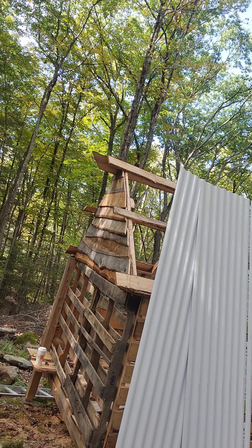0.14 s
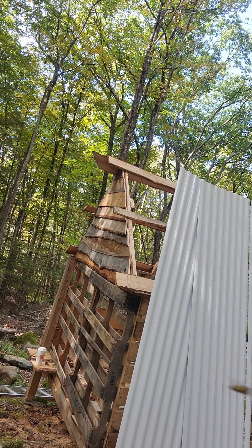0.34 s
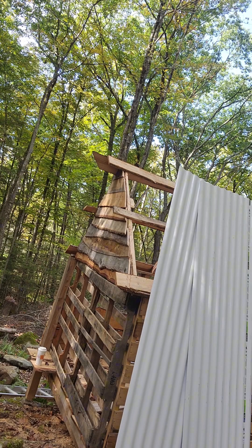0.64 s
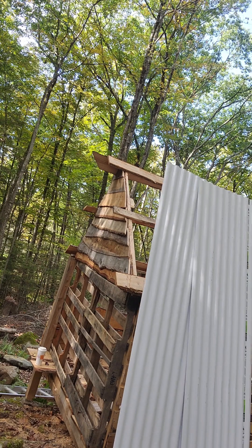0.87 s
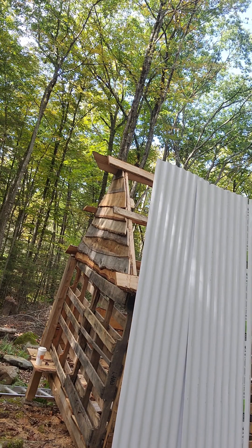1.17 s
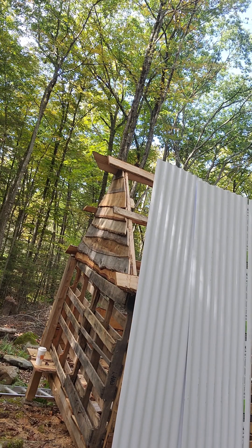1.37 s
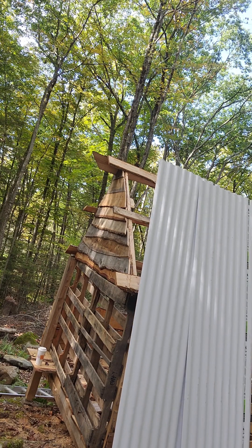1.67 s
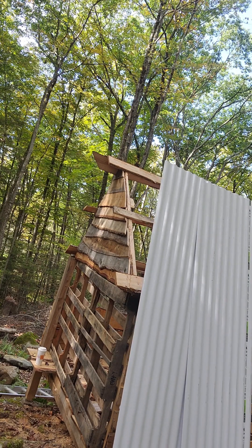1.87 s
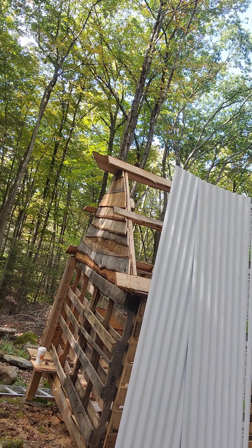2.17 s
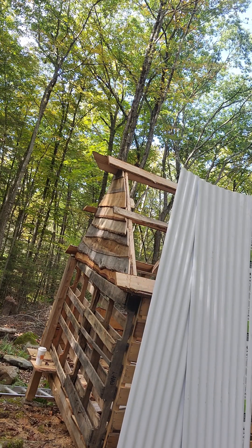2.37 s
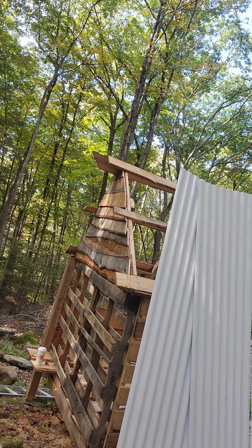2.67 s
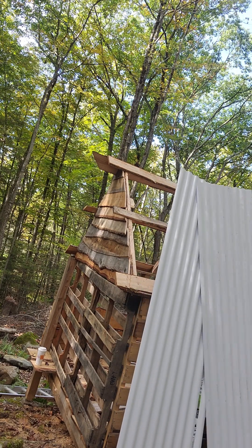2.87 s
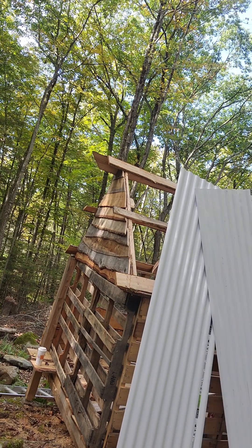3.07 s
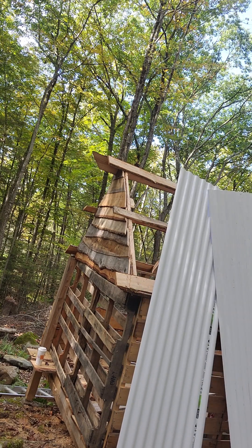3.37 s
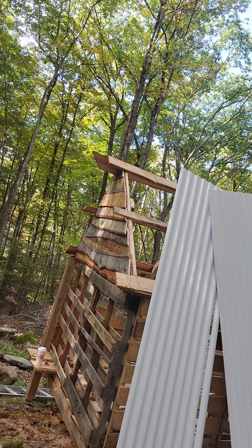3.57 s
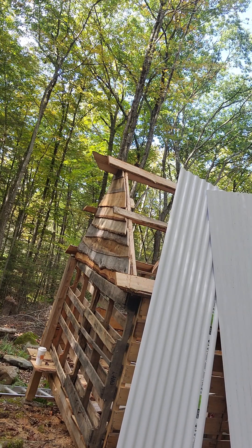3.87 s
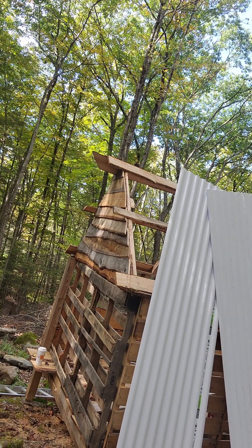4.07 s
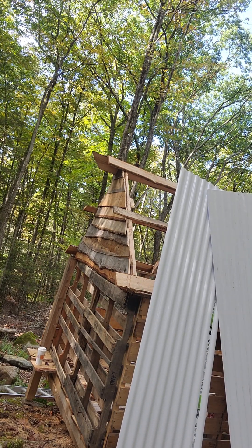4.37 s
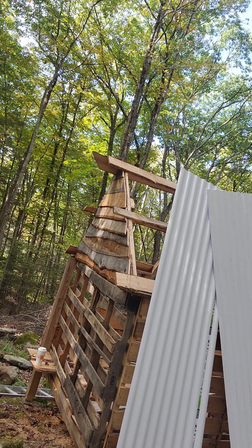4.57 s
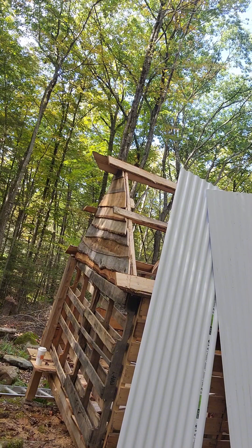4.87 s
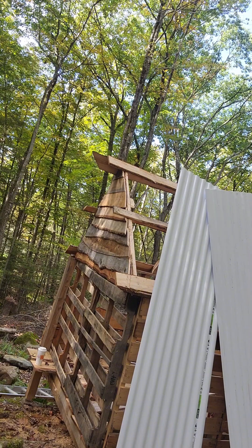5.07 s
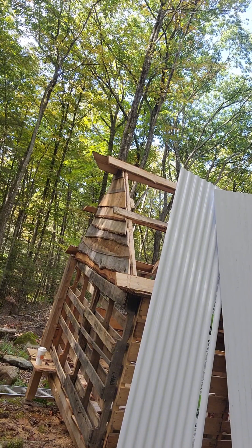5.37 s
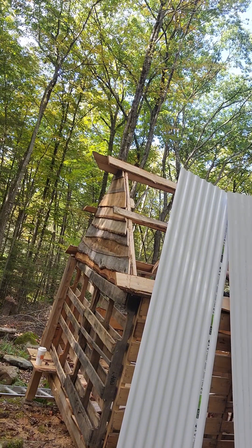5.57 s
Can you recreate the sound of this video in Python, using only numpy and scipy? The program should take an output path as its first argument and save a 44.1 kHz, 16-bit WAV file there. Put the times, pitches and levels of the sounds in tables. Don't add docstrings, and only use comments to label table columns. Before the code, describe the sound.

Close clattering and squeaky scraping of light ribbed plastic panels on wood, with low flexing thuds, over faint leaves and distant traffic drone.

```python
import sys
import numpy as np
from scipy import signal
from scipy.fft import rfft, irfft, next_fast_len
from scipy.io import wavfile
from scipy.ndimage import uniform_filter1d

SR = 44100
rng = np.random.default_rng(int(sys.argv[2]) if len(sys.argv) > 2 else 0)


def unload_audio(sound):
    columns = np.transpose(np.atleast_2d(sound))
    steps = np.round(np.clip(columns, -1, 1) * 32767)
    wavfile.write(sys.argv[1], SR, steps.astype(np.int16))


def field_ratio(decibels):
    return 10 ** (np.asarray(decibels, dtype=float) / 20)


N = 252252


def evened(x):
    return x / np.sqrt(np.mean(x ** 2) + 1e-20)


def read(points, hz):
    f, value = np.transpose(points)
    return np.interp(np.log(hz + 1), np.log(f + 1), value)


def curves(rows):
    s, *columns = np.transpose(rows)
    return [np.interp(np.arange(N) / SR, s, c) for c in columns]


def shape(x, gain_at):
    size = next_fast_len(N + 4096)
    return irfft(rfft(x, size) * gain_at(np.fft.rfftfreq(size, 1 / SR)), size)[..., :N]


def add(mix, s, sound):
    part = mix[max(round(s * SR), 0):][:len(sound)]
    part += sound[:len(part)]


def swell(t, rise, fall):
    env = (1 - np.exp(-t / abs(rise))) ** 2 * np.exp(-t / abs(fall))
    return env / env.max()


def bloom(t, length, lean):
    env = (t / length) ** lean * np.exp(-(t / length) ** 2)
    return env / env.max()


def drifting(width):
    smooth = uniform_filter1d(rng.standard_normal(N), width)
    return evened(uniform_filter1d(smooth, width))


def fuzzy_tone(hz, width_hz):
    return evened(shape(rng.standard_normal(N), lambda f: 1 / (1 + ((f - hz) / width_hz) ** 2)))


def ports(x, other, same, left):
    def alike(f):
        return np.clip(read(same, f), 0, 1)

    late_s = 6e-5
    shared = shape(x, lambda f: alike(f) * np.exp(-2j * np.pi * f * late_s))
    right = shared + shape(other, lambda f: np.sqrt(1 - alike(f) ** 2))
    return np.array([shape(x, lambda f: field_ratio(.5 * read(left, f))),
                     shape(right, lambda f: field_ratio(-.5 * read(left, f)))])


# time_s, drone_db, upper_db
LOW_AIR = [(0.0, -49, -58), (0.27, -47, -53), (1.19, -55, -47), (1.42, -39.5, -54), (1.53, -45.5, -50),
           (2.21, -46.5, -54.5), (2.4, -46.5, -48), (2.66, -42.5, -57.5), (2.87, -44.5, -60.5),
           (3.46, -53, -43.5), (3.63, -46, -58.5), (3.89, -53.5, -54.5), (3.98, -47, -51),
           (4.62, -50.5, -54), (4.72, -49, -50.5), (5.3, -50, -53), (5.53, -47, -43.5), (5.72, -45, -48)]


def low_air():
    drone_db, upper_db = curves(LOW_AIR)
    drone_hz = 51.988 + 0.88247 * drifting(6000)
    drone = np.sqrt(2) * np.sin(2 * np.pi * np.cumsum(drone_hz) / SR) + 0.25 * fuzzy_tone(47.5, 22)
    upper = fuzzy_tone(89.657, 6.0) + 1.2224 * fuzzy_tone(67.485, 20.0)
    wind = np.array([fuzzy_tone(66, 24), fuzzy_tone(61, 23)])
    rumble = np.array([fuzzy_tone(44, 11), fuzzy_tone(47, 18)])
    gusty = np.clip(np.arange(N) / SR - 3.4, 0, 1)
    buffets = field_ratio(upper_db) * (field_ratio(-1.5 - 4.17 * gusty) * upper + field_ratio(-16.5 + 6.4 * gusty) * wind)
    steady = field_ratio(drone_db - 3.9 * gusty) * drone
    return steady + buffets + field_ratio(drone_db - 10.0 + 11.335 * gusty) * rumble


# frequency_hz, level_db_per_hz
WOODS_SPECTRUM = [(60, -16), (110, -2), (320, -23), (900, -15), (1600, -19.5), (2600, -28.5), (6300, -32),
                  (7400, -47.5)]
# frequency_hz, likeness_0_to_1
WOODS_LIKENESS = [(60, 0.65), (180, 1), (550, 0.8442), (1650, 0.079), (4970, 0.01), (15000, 0.04)]
# frequency_hz, left_minus_right_db
WOODS_BALANCE = [(60, -14), (180, 4.5), (550, 3.5), (1650, 3), (4970, 6), (15000, 4.5)]


def woods():
    def colour(f):
        insects_db = 5 * np.exp(-((f - 4685.4) / 330) ** 2)
        return field_ratio(read(WOODS_SPECTRUM, f) + insects_db)

    a, b = shape(rng.standard_normal((2, N)), colour)
    level_db = -58.5 + 0.61 * drifting(5000)
    return field_ratio(level_db) * evened(ports(a, b, WOODS_LIKENESS, WOODS_BALANCE))


# start_s, level_db, pitch_hz, left_minus_right_db
WIND_PUFFS = [(4.15, -36.5, 47.29, -9), (4.227, -40, 71.69, 18.5), (4.34, -39, 52.32, -23.5),
              (4.49, -42.5, 48.89, -7.5), (4.684, -36, 101.5, -21.5), (4.74, -38.5, 56.04, 0),
              (4.88, -36, 57.45, 25), (4.93, -33.5, 77.36, 15.5), (5.059, -40.5, 55.9, -10.5),
              (5.259, -37.5, 57.44, -28), (5.439, -33, 92, -30)]


def puffs():
    out, t = np.zeros((2, N)), np.arange(5000) / SR
    for s, db, hz, left_db in WIND_PUFFS:
        push = field_ratio(db) * np.sin(2 * np.pi * hz * t) * bloom(t, 1.3903 / hz, lean=0.9596)
        add(out[0], s, push * field_ratio(min(left_db, 0) + 4.0))
        add(out[1], s, push * field_ratio(min(-left_db, 0) + 2.5))
    return out


def frame_echo(x):
    t = np.arange(9000) / SR
    signs = rng.choice([-1., 1.], (2, len(t)))
    taps = signs * (rng.random((2, len(t))) < .045) * (t > .004)
    taps = taps * field_ratio(-60 * t / 0.15547)
    return signal.oaconvolve(x[None], taps / np.linalg.norm(taps[0]), axes=1)[:, :N]


def scattered(x):
    z = signal.stft(x, nperseg=256, noverlap=192)[2]
    drift = uniform_filter1d(rng.standard_normal(z.shape[::-1]).T, size=8, axis=0)
    drift = uniform_filter1d(drift, size=60, axis=1)
    return signal.istft(z * np.exp(2.5j * evened(drift)), nperseg=256, noverlap=192)[1][:N]


# start_s, level_db, pitch_hz
BUCKLES = [(0.359, -40, 134.1), (0.391, -38.5, 200.8), (0.7968, -30.5, 241.3), (0.817, -37, 212.7),
           (0.856, -28.5, 160.2), (0.833, -35.5, 160.7), (0.879, -39, 134.1), (0.887, -40.5, 198.5),
           (0.906, -38.5, 186.2), (1.087, -34, 212.6), (1.229, -39, 148.9), (1.317, -37.5, 186),
           (1.931, -37, 198.6), (1.951, -40.5, 156.4), (2.567, -40.5, 196.5), (1.611, -39, 170.1),
           (1.92, -41, 211), (2.144, -39, 192.2), (2.224, -36.5, 234.4), (2.296, -30, 189.2),
           (2.409, -36.5, 123.5), (2.967, -39.5, 334.6), (3.003, -42.5, 288.6), (3.133, -44.5, 284.9),
           (3.242, -44, 322.4), (3.253, -37.5, 171.2), (3.298, -33.5, 410.7), (3.364, -29.5, 304.3),
           (3.378, -36.5, 194.8), (3.41, -33, 149.8), (3.4195, -31.5, 151), (3.43, -33, 129.6),
           (3.469, -37, 178.4), (3.495, -35, 169.5), (3.618, -33.5, 140.7), (3.642, -37.5, 255.1),
           (3.672, -31, 196.7), (3.7, -38, 250), (3.723, -33.5, 202.8), (3.76, -36, 141.3),
           (3.826, -43, 223.8), (3.87, -40, 219.7), (4.083, -37, 180.9), (4.028, -42.5, 254.4),
           (4.09, -36, 299.6), (4.116, -34.5, 380.6), (4.298, -37, 211), (4.36, -40, 194.3),
           (4.428, -40, 304.6), (4.515, -42.5, 199.9), (4.797, -41, 149.6), (5.274, -39.5, 176),
           (5.374, -41.5, 202.2), (5.559, -25.5, 127.8), (5.67, -33.5, 141.9), (5.684, -36, 170.2)]


def thuds():
    out, t = np.zeros(N), np.arange(6000) / SR
    u = t / 0.0005553
    pop = u ** 2 * (3 - u) * np.exp(1 - 1.1472 * u)
    for s, db, hz in BUCKLES:
        pop_db = -2 - 3.5 * np.log2(hz / 170)
        body = np.sin(2 * np.pi * hz * t) * swell(t, 0.0007, 2.0 / hz)
        body = body + 0.20753 * np.sin(2 * np.pi * 2.2 * hz * t) * swell(t, 0.00027, 3.373 / hz)
        add(out, s, field_ratio(db - 5.5) * (body + field_ratio(pop_db) * pop))
    return out


# start_s, level_db, brightest_hz
EDGE_SNAPS = [(0.767, -36.5, 2720), (0.7873, -33, 3102), (0.8015, -32, 4934), (0.9579, -31, 2760),
              (1.0635, -38.5, 3472), (2.077, -33.5, 2407), (2.1002, -43, 2400), (2.13, -43.5, 4000),
              (2.228, -37, 3005), (2.293, -30.5, 3382), (2.311, -37, 3000), (2.337, -36.5, 3896),
              (2.762, -42, 3424), (2.819, -50.5, 3770), (2.866, -40, 2560), (2.9501, -28.5, 3504),
              (2.992, -50.5, 3333), (3.055, -49.5, 4500), (3.073, -48.5, 5034), (3.2167, -40.5, 2995),
              (3.241, -41, 3126), (3.389, -35.5, 2800), (3.016, -43, 5460), (3.1121, -44, 5760),
              (3.257, -38, 3501), (3.37, -29.5, 5297), (3.726, -45.5, 2730), (3.907, -41, 3484),
              (4.106, -50.5, 3494), (5.598, -36.5, 3515), (5.6145, -35.5, 6130), (5.64, -37, 6400),
              (5.644, -38, 6260)]
# frequency_hz, level_db_per_hz
GRIT_SPECTRUM = [(700, -57.5), (1600, -1), (2600, 0.5), (4000, -0.5), (5500, 1), (7400, -3.5),
                 (15000, -10.5)]


def edge_snaps():
    out, t = np.zeros(N), np.arange(1024) / SR
    hz_axis = np.fft.rfftfreq(len(t), 1 / SR)
    for (s, db, hz), noise in zip(EDGE_SNAPS, rng.standard_normal((len(EDGE_SNAPS), len(t)))):
        tilt = .08 + 1 / (1 + ((hz_axis - hz) / 1900) ** 2)
        burst = evened(irfft(rfft(noise) * field_ratio(read(GRIT_SPECTRUM, hz_axis)) * tilt))
        add(out, s - .0005, field_ratio(db - 12.0) * burst * swell(t, 0.0001, 0.0022))
    return out


# start_s, level_db, brightest_hz, length_s
WOOD_SCUFFS = [(0.7816, -31, 5908, 0.006193), (0.785, -34.5, 3187, 0.00705), (1.06, -47.5, 3380, 0.01857),
               (1.379, -51, 3216, 0.0118), (1.5959, -49.5, 2628, 0.01424), (3.296, -47, 2515, 0.02679),
               (3.371, -47.5, 5590, 0.012), (3.383, -42.5, 2509, 0.01383), (3.668, -45, 3124, 0.01035),
               (3.682, -44, 3219, 0.010115), (3.907, -38, 2583, 0.005186), (4.1026, -47.5, 2920, 0.01498),
               (5.524, -39, 5725, 0.01295), (5.599, -44.5, 3710, 0.00898), (5.623, -53.5, 5586, 0.01275)]
# start_s, level_db, brightest_hz, length_s
SHEET_RASPS = [(0.944, -41.5, 2646, 0.017033), (2.074, -47.5, 2496, 0.005574),
               (2.097, -54.5, 2503, 0.01508), (2.1283, -49.5, 3932, 0.02734),
               (2.231, -45.5, 3747, 0.007324), (2.2951, -41, 3354, 0.01668), (2.324, -48.5, 2851, 0.02128),
               (2.753, -42.5, 3052, 0.03001), (2.823, -43.5, 3780, 0.01783), (2.721, -53, 3344, 0.01643),
               (2.765, -44.5, 7560, 0.01801), (2.869, -41.5, 2570, 0.02243), (2.947, -39, 5227, 0.0119),
               (2.981, -41.5, 3286, 0.02255), (2.998, -42.5, 5460, 0.05593), (3.066, -37, 4988, 0.0077),
               (3.1, -40, 5637, 0.0363), (3.261, -42.5, 3359, 0.01776), (3.153, -42, 3223, 0.01445),
               (3.213, -54.5, 3000, 0.01275), (3.243, -48.5, 3194, 0.00596), (2.052, -51, 3899, 0.017),
               (2.423, -55.5, 3500, 0.00959)]


def scratches():
    out, t = np.zeros(N), np.arange(4096) / SR
    hz_axis = np.fft.rfftfreq(len(t), 1 / SR)
    # finest grit in dB, muffled by wood but not by plastic
    rows = [row + (-14,) for row in WOOD_SCUFFS] + [row + (-0.5,) for row in SHEET_RASPS]
    draws = rng.standard_normal((len(rows), 2, len(t)))
    for (s, db, hz, length, fine_db), (noise, bumps) in zip(rows, draws):
        peak = 1 + 1.3 / (1 + ((hz_axis / hz - 1) / .16) ** 2)
        colour = field_ratio(read(GRIT_SPECTRUM, hz_axis)) * peak * field_ratio(fine_db * (hz_axis > 8800))
        crackle = field_ratio(3.2 * evened(uniform_filter1d(bumps, size=70)))
        burst = evened(irfft(rfft(noise * crackle) * colour))
        add(out, s - .001, field_ratio(db - 10.5) * burst * bloom(t, 1.4046 * length, lean=0.3))
    return out


# start_s, level_db, pitch_hz, length_s
RIB_SQUEAKS = [(0.892, -46.5, 1064, 0.00887), (1.103, -47, 889.2, 0.00652), (1.13, -49.5, 1394, 0.005345),
               (1.176, -57, 1042, 0.0067), (1.253, -50.5, 802.9, 0.0074), (1.316, -48, 804, 0.00478),
               (1.382, -48.5, 907.8, 0.00575), (1.81, -46.5, 907.4, 0.01166), (1.859, -54, 1904, 0.00843),
               (1.865, -52, 707.6, 0.00868), (2.076, -54, 2426, 0.00517), (2.114, -48, 991.7, 0.00708),
               (2.125, -55.5, 4020, 0.00531), (2.153, -46.5, 892.2, 0.00795), (2.207, -32.5, 806, 0.005006),
               (2.439, -42, 795, 0.010365), (2.489, -53.5, 849.4, 0.0236), (2.567, -49, 736.4, 0.00757),
               (2.619, -53.5, 786, 0.01833), (2.753, -57.5, 2845, 0.00576), (2.764, -56, 3491, 0.00895),
               (2.779, -50.5, 2198, 0.01234), (2.791, -53.5, 2782, 0.00763), (2.818, -35, 1300, 0.00763),
               (2.891, -59.5, 3222, 0.00501), (3.014, -48, 5464, 0.00588), (3.053, -50, 4522, 0.00407),
               (3.072, -49.5, 5045, 0.00525), (3.12, -33.5, 2009, 0.003373), (3.132, -45, 2046, 0.0034),
               (3.282, -45, 1200, 0.01338), (3.303, -48, 2506, 0.00631), (3.762, -54, 788.9, 0.0083)]


def squeaks():
    out, t = np.zeros(N), np.arange(2600) / SR
    for s, db, hz, length in RIB_SQUEAKS:
        note = np.sin(2 * np.pi * hz * t * (1 - 0.02184 * t / length))
        add(out, s, field_ratio(db) * note * bloom(t, length, lean=0.5573))
    return out


# start_s, level_db, pitch_hz, ring_s
EDGE_RAPS = [(0.395, -43.5, 887.3, 0.00399), (0.768, -54.5, 894.3, 0.004385),
             (0.7858, -34, 879.7, 0.005966), (0.7965, -31, 600.7, 0.0032), (0.8055, -35.5, 709.1, 0.0045),
             (0.811, -42, 458.9, 0.00405), (0.8565, -43, 503.8, 0.0029), (0.885, -48, 1494, 0.002886),
             (0.902, -46, 999.6, 0.00701), (1.9097, -39, 1236, 0.003283), (2.069, -37, 968.8, 0.0039),
             (2.085, -46, 909.6, 0.00702), (2.146, -34, 1099, 0.0061), (2.235, -35, 911.9, 0.00819),
             (2.324, -44, 806.7, 0.00657), (2.337, -34.5, 1404, 0.00523), (2.978, -37, 1302, 0.0082),
             (3.018, -40.5, 895.3, 0.01036), (3.093, -34, 1080, 0.00753), (3.128, -39.5, 1924, 0.003673),
             (3.143, -37.5, 1320, 0.0115), (3.204, -36.5, 504.2, 0.00969), (3.2407, -42.5, 989.6, 0.004035),
             (3.254, -48.5, 1098, 0.003435), (3.3645, -33, 468.7, 0.0039), (3.374, -30.5, 721.5, 0.0062),
             (3.3905, -34.5, 1001, 0.001692), (3.399, -39, 596.1, 0.00524), (3.4095, -30, 399.8, 0.0044),
             (3.671, -38, 1181, 0.00317), (3.471, -47, 887.3, 0.0026), (4.216, -44.5, 705.9, 0.0041),
             (4.45, -44.5, 756.4, 0.0042), (4.514, -55.5, 826, 0.004507), (4.802, -49, 1050, 0.007),
             (5.127, -49.5, 906.4, 0.015), (5.258, -48.5, 640.8, 0.007), (5.372, -43.5, 702.7, 0.003075),
             (5.42, -47.5, 1051, 0.0058), (5.488, -56.5, 707.4, 0.00508), (5.5982, -18.5, 817.5, 0.004467),
             (5.603, -28, 646, 0.0059), (5.609, -33.5, 838.3, 0.0072), (5.622, -37, 748, 0.00734),
             (5.638, -46.5, 1096, 0.0028)]


def raps():
    out, t = np.zeros(N), np.arange(3000) / SR
    rise_s = 0.00032
    for s, db, hz, ring in EDGE_RAPS:
        low = np.sin(2 * np.pi * hz * t) * swell(t, rise_s, ring)
        high = np.sin(2 * np.pi * 1.6 * hz * t) * swell(t, rise_s, 0.5858 * ring)
        add(out, s, field_ratio(db - 5.5) * (low + field_ratio(-5) * high))
    return out


def grains(modes, per_s, cycles, spread_db, detune):
    out = np.zeros(N)
    size = field_ratio(spread_db * np.minimum(rng.exponential(1, N), 3)) * (rng.random(N) < per_s / SR)
    pick = rng.integers(0, 3 * len(modes), N)
    for k, (hz, db) in enumerate(modes * 3):
        hz = hz * (1 + detune * (k // len(modes) - 1))
        turns = np.arange(0, 8 * cycles, hz / SR)
        ring = field_ratio(db) * swell(turns / hz, .5 / hz, cycles / hz) * np.sin(2 * np.pi * turns)
        out += signal.oaconvolve(size * (pick == k), ring)[:N]
    return evened(out)


# start_s, level_db, pitch_hz, ring_s
RIB_CHIRPS = [(0.957, -41.5, 2821, 0.005676), (1.063, -37.5, 847.8, 0.015083), (1.782, -43, 914.6, 0.01215),
              (1.971, -54, 688.3, 0.00651), (2.1334, -39, 1324, 0.009056), (2.179, -29.5, 831.8, 0.006057),
              (2.199, -30, 790.6, 0.007187), (2.3085, -28.5, 757.2, 0.0098), (2.348, -30.5, 737.3, 0.0122),
              (2.37, -29, 718.1, 0.012335), (2.791, -31, 1096, 0.005613), (2.825, -24, 1285, 0.006144),
              (2.869, -32, 2478, 0.005536), (2.868, -37.5, 2181, 0.00527), (3.065, -38.5, 1111, 0.01574),
              (3.2088, -37, 1237, 0.01172), (3.3052, -25, 1246, 0.005204), (3.391, -31.5, 764.5, 0.00978),
              (3.3927, -33.5, 1313, 0.006807), (5.558, -38.5, 515.1, 0.013934),
              (3.113, -30, 2055, 0.005447)]
# start_s, level_db, pitch_hz, ring_s
RIB_KNOCKS = [(0.362, -43.5, 1093, 0.00525), (0.395, -43.5, 954.8, 0.00491), (0.768, -37.5, 660.5, 0.01057),
              (1.612, -39, 794, 0.007684), (0.7943, -29, 1089, 0.011526), (0.9497, -35.5, 1485, 0.009944),
              (1.52, -44.5, 837, 0.01758), (1.596, -35.5, 1445, 0.007015), (1.91, -30.5, 1209, 0.011083),
              (2.068, -42, 1068, 0.04273), (2.299, -27, 751.2, 0.03473), (2.426, -36, 729.1, 0.01446),
              (2.678, -44, 909.3, 0.01462), (2.722, -44.5, 982.2, 0.01484), (2.763, -39.5, 896.8, 0.02005),
              (2.817, -35.5, 843.8, 0.01722), (2.839, -30.5, 1308, 0.004515), (2.959, -35, 847.6, 0.01546),
              (2.984, -36.5, 1657, 0.01545), (3.04, -34, 831.6, 0.0169), (3.112, -43.5, 1333, 0.00768),
              (3.19, -33.5, 910.2, 0.00984), (2.88, -42, 1192, .013), (3.365, -36.5, 548.1, 0.02104),
              (3.671, -33, 1358, 0.00325), (3.689, -38.5, 1268, 0.01497), (3.725, -34, 730.6, 0.0024),
              (3.824, -51.5, 612, 0.01265), (3.909, -30, 861, 0.00358), (4.113, -41.5, 794.5, 0.0114),
              (4.106, -42.5, 1257, 0.01353), (5.602, -37.5, 801.3, 0.00982), (5.619, -40, 1247, 0.01707)]
# frequency_hz, level_db
LOW_RIB_MODES = [(600, -8.5), (740, -1.5), (860, -1), (1060, -1), (1300, 0.5)]
HIGH_RIB_MODES = [(1550, -0.5), (1750, -12.5), (2050, 2), (2350, -1.5), (2600, -5.5)]


def catches():
    out, t = np.zeros(N), np.arange(4400) / SR
    clatter = grains(LOW_RIB_MODES + HIGH_RIB_MODES[:1],
                     per_s=3000, cycles=2.977, spread_db=1.5, detune=0.09325)
    knocks = np.zeros(N)
    rows = [row + (0.12616,) for row in RIB_CHIRPS] + [row + (0.49177,) for row in RIB_KNOCKS]
    for (s, db, hz, ring, share), turn in zip(rows, rng.random((len(rows), 2))):
        first = np.sin(2 * np.pi * (hz * t + turn[0]))
        second = np.sin(2 * np.pi * (1.08 * hz * t + turn[1]))
        note = (first + 0.22 * second) * bloom(t, 0.99 * ring, lean=0.65 - 0.78 * share)
        add(out, s - .002, field_ratio(db - 4.0) * (1 - share) * note)
        add(knocks, s - .0015, field_ratio(db - 5.5) * share * swell(t, 0.001116, 1.0651 * ring))
    return out + knocks * clatter


# peak_s, bending_db, rubbing_db, rise_s and fade_s
# (times to change by 20 dB; their sign does not matter)
PUSHES = [(0.385, -57, -78.5, -0.0662, 0.6128), (0.787, -37.5, -54.5, 0.017, 0.0007),
          (0.82, -44.5, -67.5, -0.163, 0.6743), (1.55, -56.5, -64, -0.015, 0.0007),
          (1.598, -45, -62.5, -0.1667, 0.0772), (1.75, -56.5, -71, 0.4778, -1.5),
          (1.912, -48.5, -69, -0.1257, 0.5143), (2.092, -47.5, -55.5, 0.0337, 0.2965),
          (2.299, -39, -54.5, -0.028, 0.1683), (2.7, -54, -72, -0.3295, -0.8875),
          (2.766, -47.5, -61, -0.1242, 0.2412), (3.031, -46.5, -59.5, -0.0018, 0.553),
          (3.273, -53.5, -58, 0.4764, 0.0607), (3.369, -40.5, -64.5, 0.0554, 0.1983),
          (3.491, -50, -72, 2.7791, 0.09), (3.62, -49.5, -84, -1.0253, 0.4039),
          (3.673, -43.5, -74, 0.1466, 0.2653), (3.83, -50, -85, 2.8823, 1.042),
          (3.909, -51, -78.5, 2, 1.1253), (5.3, -59, -80.5, 1.4108, 1.9813),
          (5.532, -58, -81.5, 1.4276, -0.868), (5.56, -50, -81, -0.3307, -1.21),
          (5.604, -40, -69, 0.0927, 0.2041), (5.67, -47, -74.5, -0.364, -1.5)]


def effort():
    t = np.arange(0, N + 64, 64) / SR
    s, bend_db, rub_db, rise, fade = np.transpose(PUSHES)[:, :, None]
    before, after = np.maximum(s - t, 0) / abs(rise), np.maximum(t - s, 0) / abs(fade)
    bend = field_ratio(-75.5) + field_ratio(bend_db - 20 * (before + after / 1.2642)).max(0)
    rub = field_ratio(-84) + field_ratio(rub_db - 20 * (before + after)).max(0)
    return curves(np.transpose([t, 20 * np.log10(bend), 20 * np.log10(rub)]))


# frequency_hz, level_db
FLEX_MODES = [(110, -4), (155, -3.5), (205, -1), (280, -4), (360, -2), (470, -12)]
# frequency_hz, level_db
EDGE_MODES = [(3000, 2.5), (3500, 6), (4100, 6.5), (4800, -1.5), (5600, 5.5), (6500, -13), (7500, -8)]


def sliding():
    flex_db, grit_db = effort()
    ribs_db = flex_db + 0.60162 * (grit_db - flex_db) + 7
    high_db = flex_db + 0.9453 * (grit_db - flex_db) + 2.5
    ribs = grains(LOW_RIB_MODES, per_s=900, cycles=2.627, spread_db=3.0, detune=0.043)
    high = grains(HIGH_RIB_MODES, per_s=1600, cycles=5.0, spread_db=1.5, detune=0.056)
    flex = grains(FLEX_MODES, per_s=330, cycles=2.178, spread_db=3.5, detune=0.066317)
    edges = grains(EDGE_MODES, per_s=1200, cycles=14.0, spread_db=4.5, detune=0.046)
    flicker_db = 2.8 * evened(uniform_filter1d(rng.standard_normal(N), 300))
    noise = rng.standard_normal(N) * field_ratio(flicker_db)
    hiss = evened(shape(noise, lambda f: field_ratio(read(GRIT_SPECTRUM, f) - 7.778 * (f > 8800))))
    grit = field_ratio(-5.0) * hiss + field_ratio(-2.5) * edges
    ringing = field_ratio(ribs_db - 2) * ribs + field_ratio(high_db - 4.0) * high
    return ringing + field_ratio(flex_db) * flex + field_ratio(grit_db) * grit


# frequency_hz, likeness_0_to_1
SHEET_LIKENESS = [(60, 0.9838), (180, 1), (550, 1), (1650, 0.78146), (4970, 0.01), (15000, 0.01)]
# frequency_hz, left_minus_right_db
SHEET_BALANCE = [(60, 5), (150, -0.5), (380, 2.5), (950, -0.5), (2380, 4), (5980, -1), (15000, 42)]


def scene():
    sheet = sliding() + catches() + scratches() + thuds() + raps() + squeaks()
    snaps = edge_snaps()
    near = ports(sheet, scattered(sheet), SHEET_LIKENESS, SHEET_BALANCE)
    spot = shape(snaps, lambda f: field_ratio(np.outer([.5, -.5], read(SHEET_BALANCE, f)) - 4.0))
    spot = np.array([spot[0], np.roll(spot[1], shift=2)])
    return near + spot + field_ratio(-12) * frame_echo(sheet + snaps) + woods() + low_air() + puffs()


def top_cut(x):
    return signal.sosfilt(signal.butter(12, 15760, fs=SR, output="sos"), x)


# frequency_hz, level_db
TREBLE_RESPONSE = [(7600, 0), (8150, -15.5), (8380, -44), (9400, -43), (9750, -12), (11500, -18.5),
                   (15600, -24.5), (15850, -55)]


def record(dry):
    hiss = field_ratio(-89.5) * evened(np.diff(rng.standard_normal((2, N + 2)), n=2))
    closing = np.clip((N - np.arange(N)) / 130, 0, 1)
    heard = shape(dry * closing, lambda f: field_ratio(read(TREBLE_RESPONSE, f)))
    return top_cut(heard + hiss)


dry = scene()
out = record(dry)
unload_audio(out)
```